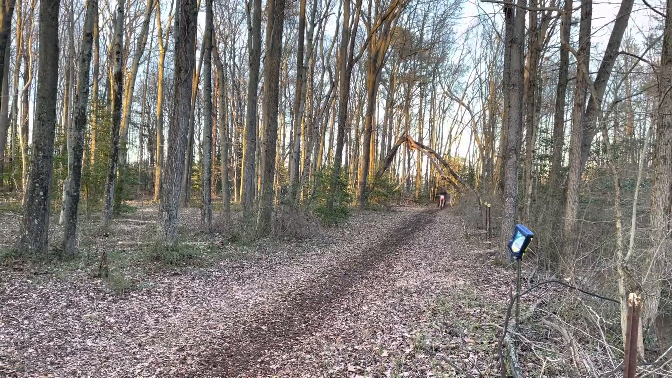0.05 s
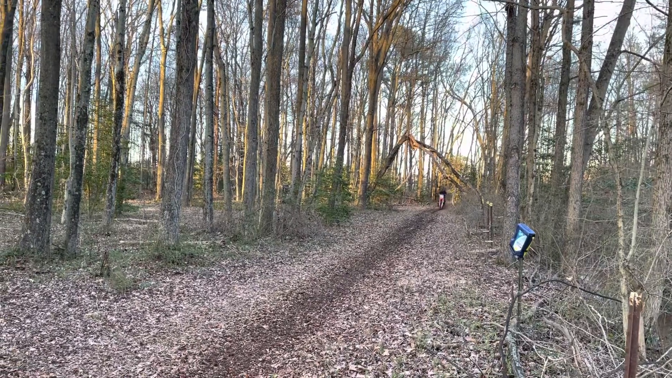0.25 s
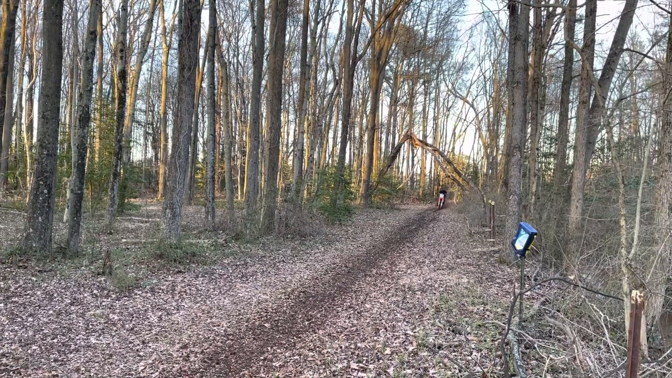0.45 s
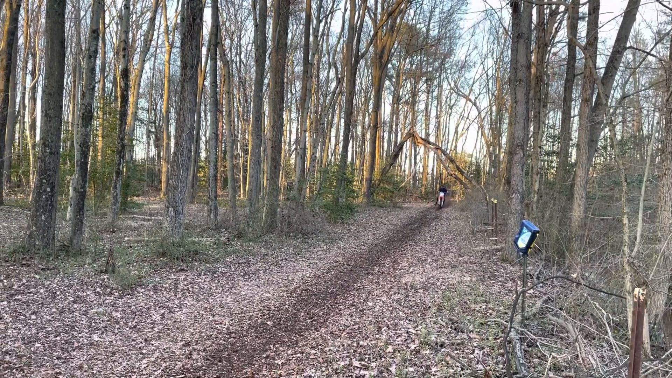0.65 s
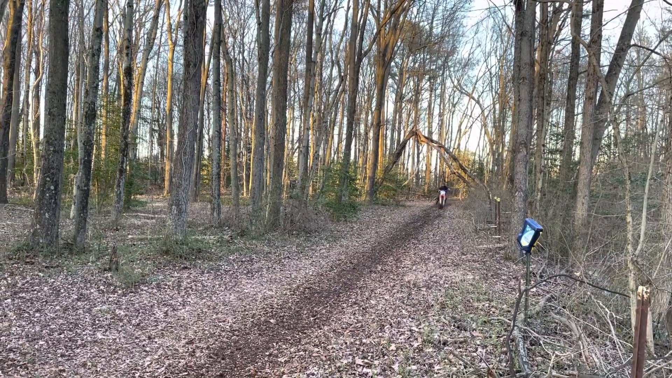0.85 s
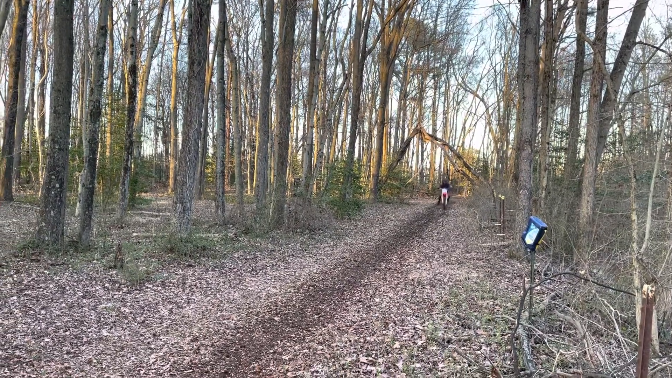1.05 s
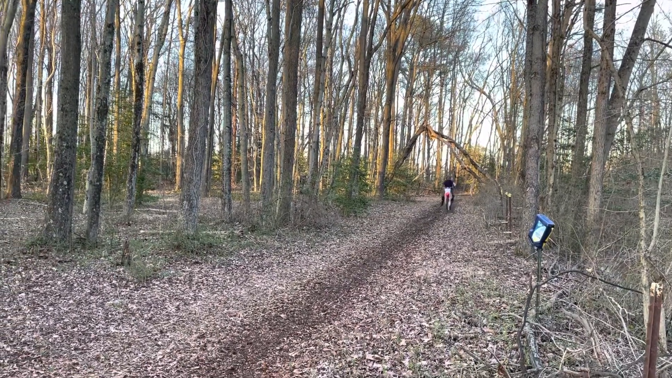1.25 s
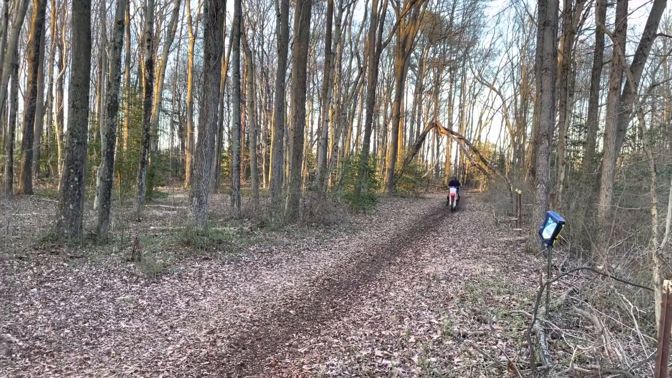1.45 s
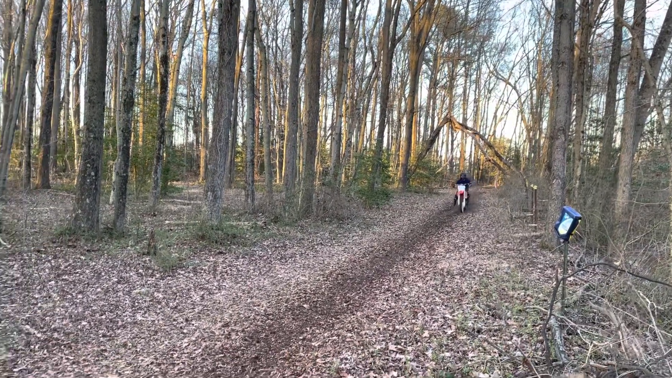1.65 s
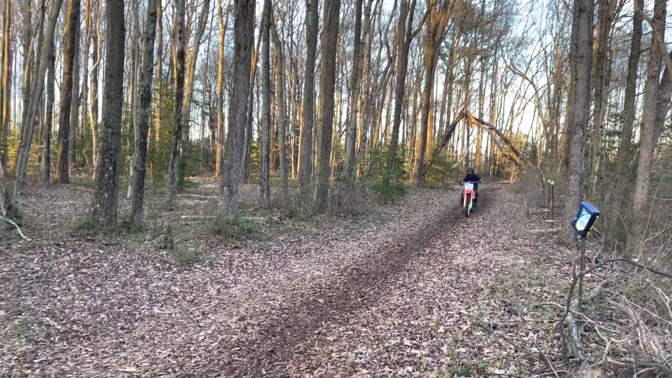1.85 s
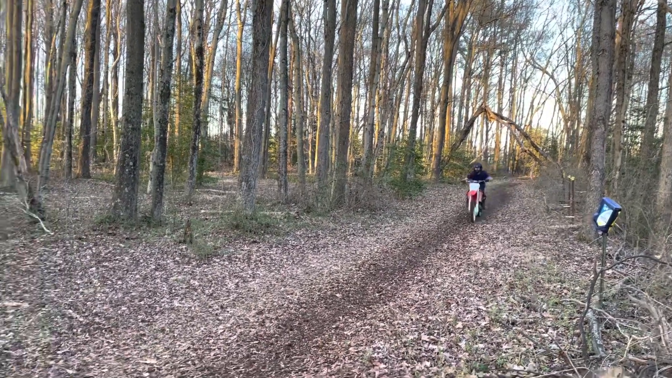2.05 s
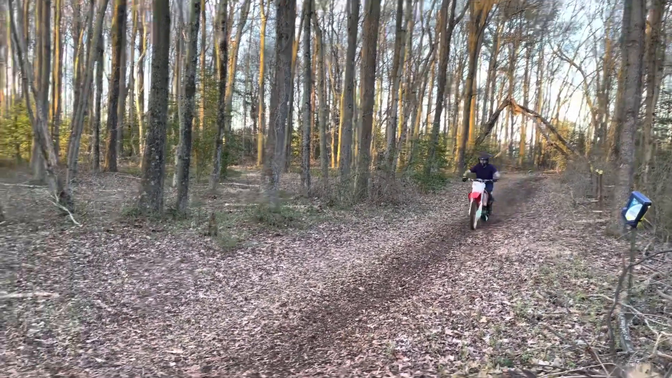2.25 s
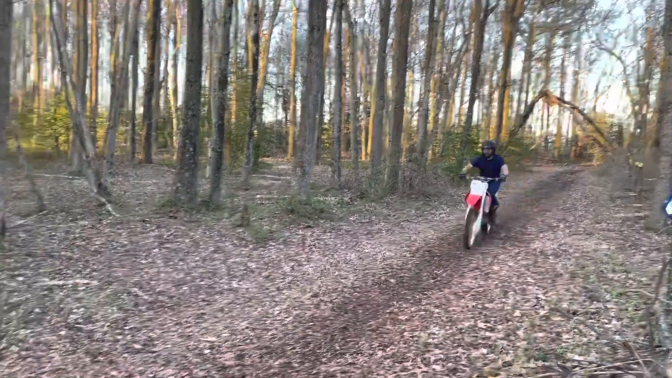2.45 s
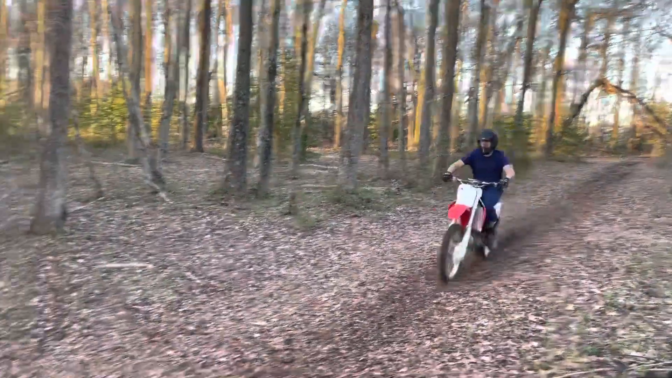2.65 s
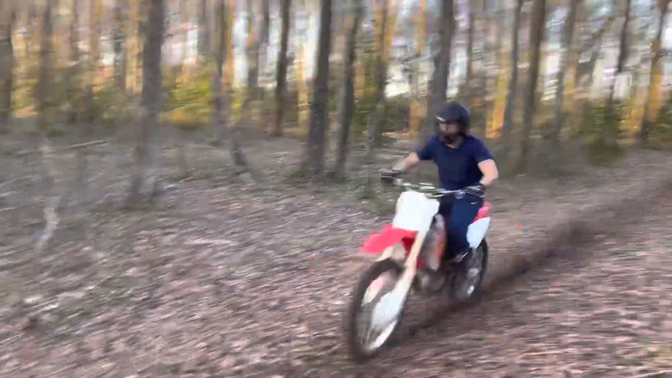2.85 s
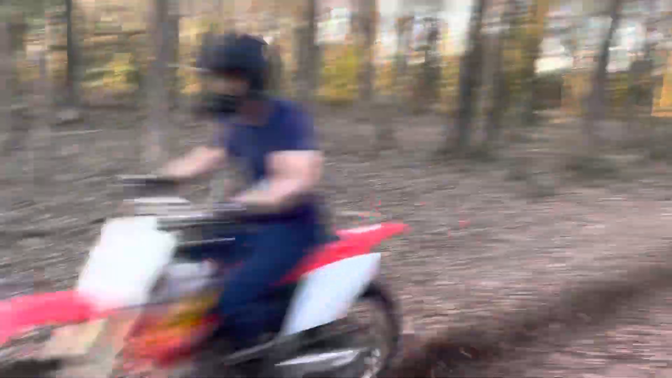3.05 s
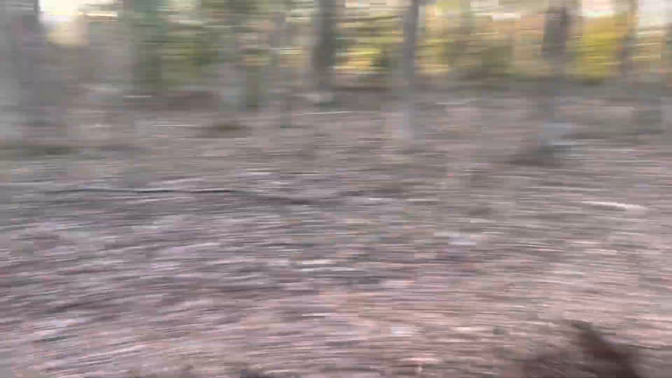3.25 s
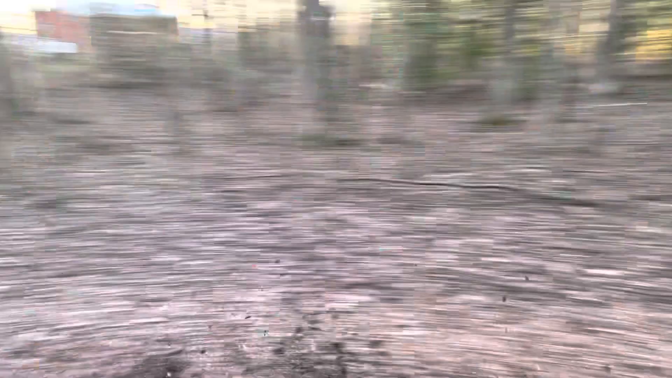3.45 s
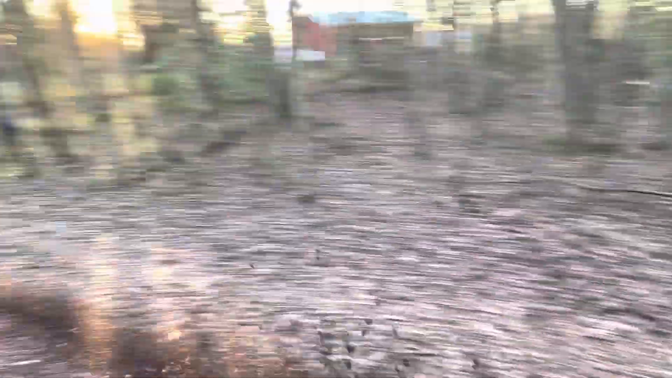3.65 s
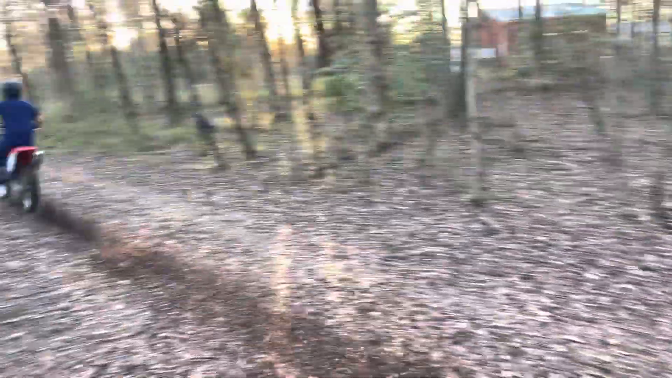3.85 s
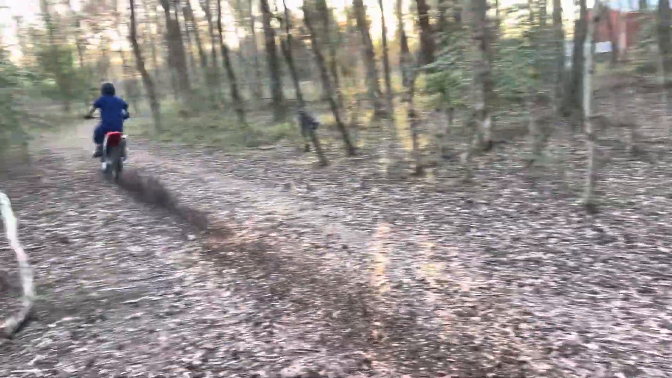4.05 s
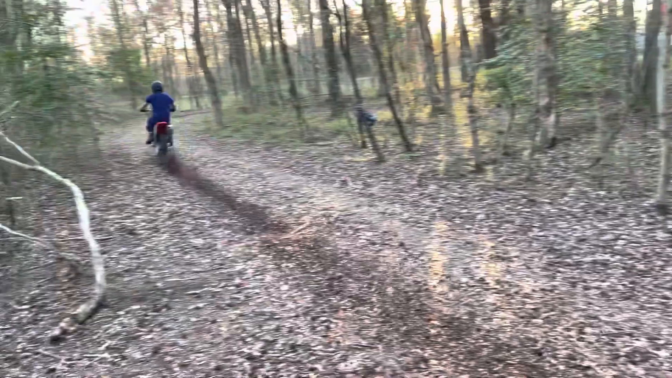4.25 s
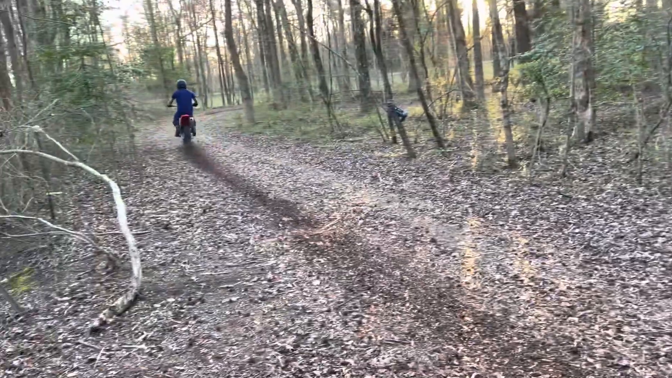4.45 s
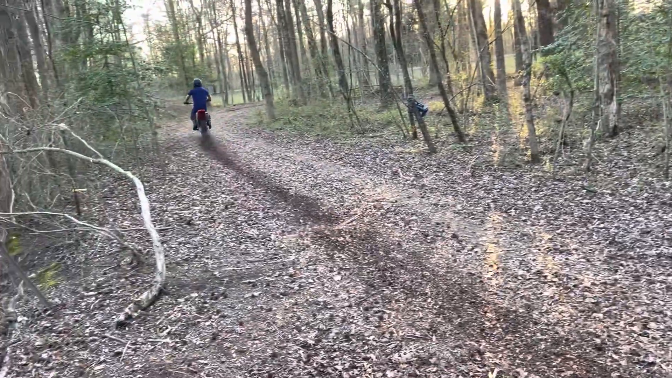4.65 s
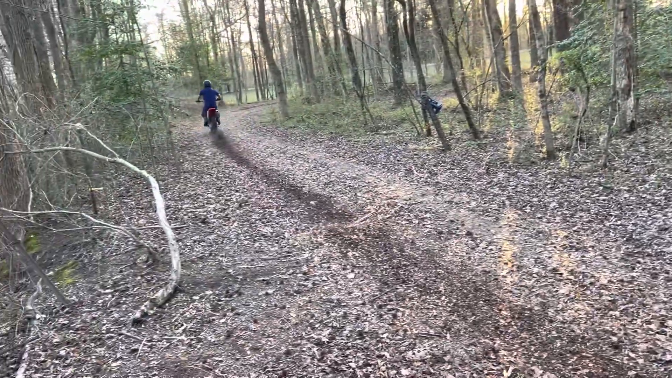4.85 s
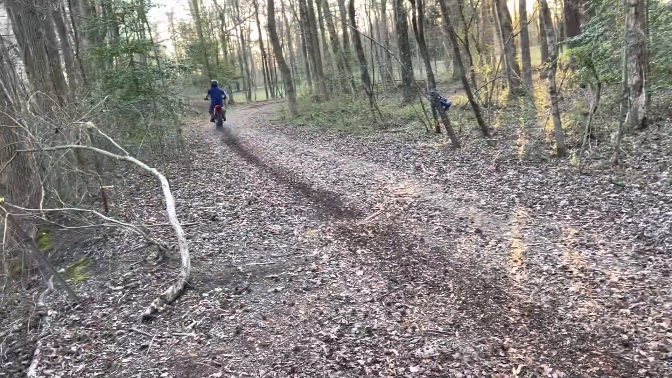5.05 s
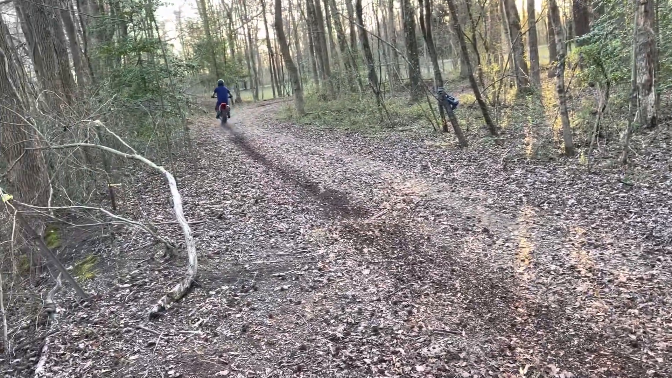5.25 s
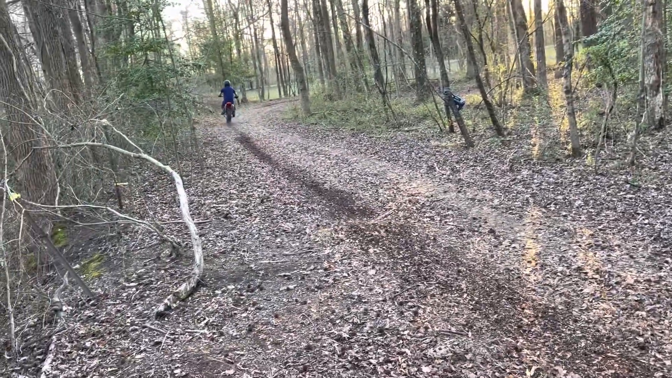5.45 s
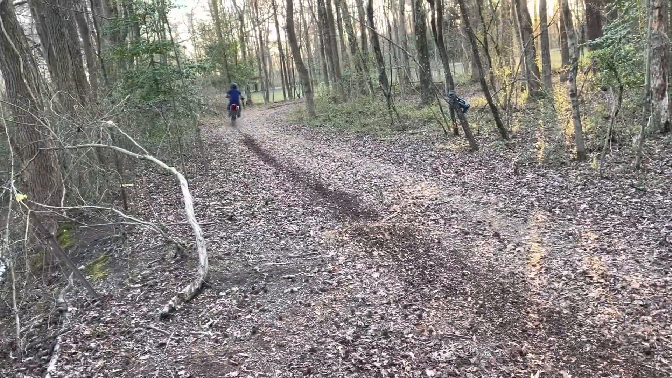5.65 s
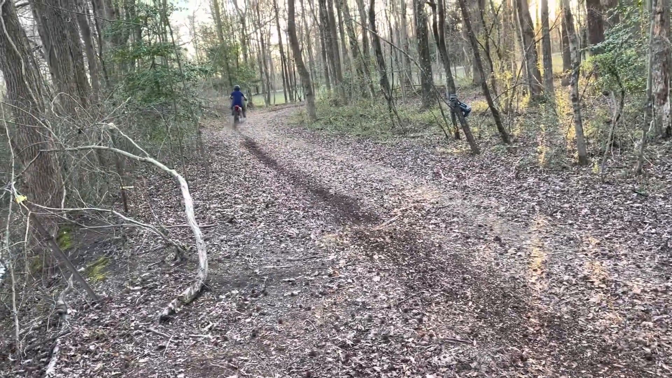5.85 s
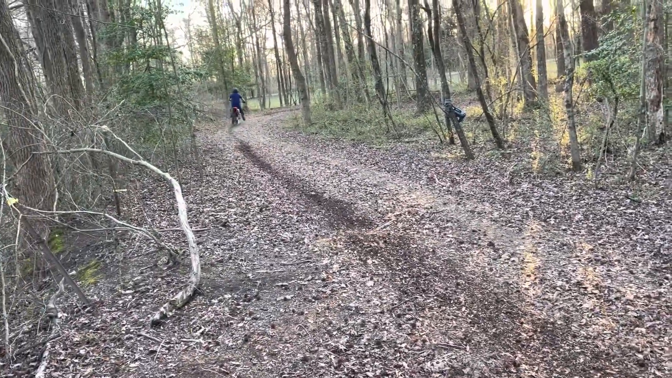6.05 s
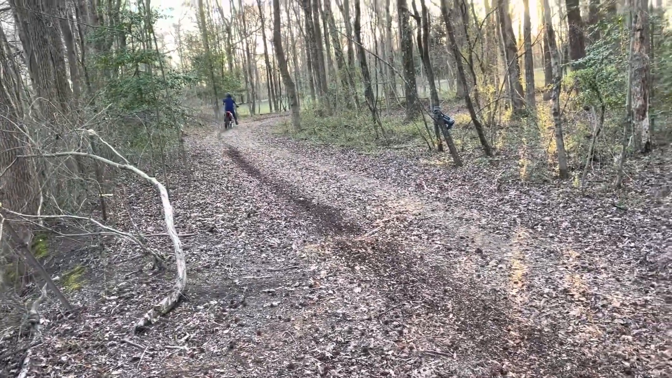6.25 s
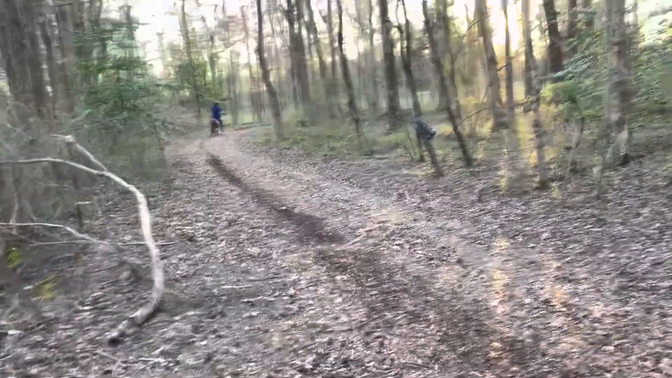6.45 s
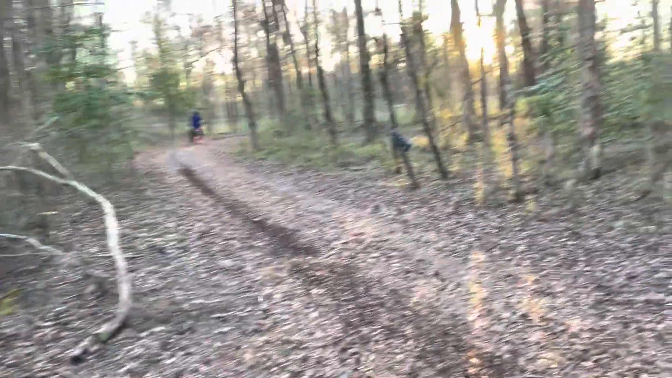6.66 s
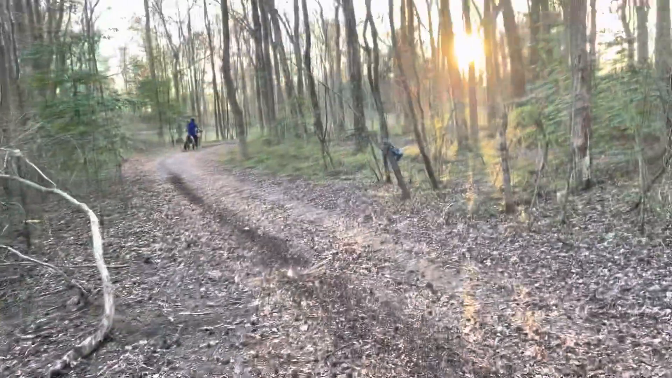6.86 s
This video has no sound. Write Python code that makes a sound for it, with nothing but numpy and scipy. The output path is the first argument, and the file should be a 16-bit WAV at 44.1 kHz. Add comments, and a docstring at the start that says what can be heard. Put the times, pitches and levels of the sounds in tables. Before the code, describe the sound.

In leafy woods, a single-cylinder four-stroke dirt bike approaches in five raspy throttle bursts, growing louder as tree echoes surround it. The throttle shuts and the pitch falls as it sweeps right past the microphone with tyres crunching leaves. Dirt patters down, the engine coasts away in slow separate thumps, two sharp exhaust bangs crack, and twigs and leaves stir nearby.

```python
"""Dirt bike passing on a wooded trail

Stereo, ear height 1.5 m, 1.8 m off the trail: a single-cylinder four-stroke comes up in short bursts of
throttle, rolls off, passes close at about 3.15 s and coasts away. Each engine cycle sends a filtered puff
through the silencer; shaped noise in step with the cycles makes the rasp, intake, valve gear and cases.
On the overrun, impulses make hard charges thump and crack, and twice the exhaust bangs. Random echoes are
the trunks; noise and grains are dry leaves under the tyres and nearby, twigs, ticks and the hush of the wood."""
import sys
import numpy as np
from scipy import signal
from scipy.fft import rfft, irfft, next_fast_len
from scipy.io import wavfile
from scipy.ndimage import uniform_filter1d

SR = 44100
rng = np.random.default_rng(int(sys.argv[2]) if len(sys.argv) > 2 else 0)


def put_to_file(sound):
    """Save the sound as 16-bit audio at rate SR, in the file named by the first command-line argument."""
    columns = np.atleast_2d(sound).T  # one column per channel
    safe = np.clip(columns, -1, 1)
    whole_steps = np.round(safe * 32767)
    wavfile.write(sys.argv[1], SR, whole_steps.astype(np.int16))


N = 305157
SIZE = next_fast_len(N + SR)
SIZE += SIZE % 2
HZ = np.maximum(np.arange(SIZE // 2 + 1) * SR / SIZE, 1)
TIME = np.arange(N) / SR

# Straight ride past the microphone; the two heights set the lag of the ground bounce
PASSING_S, NEAREST_M, SPEED_M_S = 3.15, 1.8, 7.2
PIPE_HEIGHT_M, EAR_HEIGHT_M = 0.601, 1.482

# Bursts of throttle: opens t/s, speed then/(cycles/s), eases t/s, speed then/(cycles/s),
# bend of the climb (over 1 = quick at first), throttle 0-1, throttle left on afterwards 0-1
THROTTLE_BURSTS = [(0.0, 104.4, 0.12, 114.7, 1.1, 0.99, 0.94), (0.235, 79.53, 0.49, 92.7, 1.5, 0.92, 0.79),
                   (0.69, 82.37, 0.88, 94.56, 1.2, 0.89, 0.95),
                   (1.05, 88.2, 1.332, 113.1, 0.4, 0.941, 0.015),
                   (1.542, 82.52, 2.02, 107.3, 1.6, 0.87, 0.23)]
# Throttle shut, rolling past and away: t/s, engine speed/(cycles/s)
COASTING = [(2.16, 80.5), (2.36, 76.5), (2.55, 70.6), (2.7, 70.5), (2.8, 68.4), (2.87, 65.2), (2.95, 59.3),
            (3.05, 51), (3.15, 46.3), (3.22, 47), (3.29, 42), (3.36, 35.5), (3.46, 31.5), (3.56, 29.5),
            (3.72, 25.2), (3.9, 22.5), (4.77, 21.6), (4.83, 33), (4.93, 40), (5.19, 38.5), (5.3, 30),
            (5.4, 24), (5.82, 23.2), (5.97, 31.5), (6.2, 31.2), (6.55, 28.6), (6.9, 26.8)]
SAG_BEND, THROTTLE_OPENS_S = 1.2, 0.012
# Bumps in the trail jolt the driven wheel: rms share of engine speed at full load, random steps per s
JOLT_SHARE, JOLT_STEPS_PER_S = 0.009, 22

# Exhaust close by, throttle shut: engine speed/(cycles/s), boom, bark, rasp, blare level/dB
EXHAUST_LEVELS = [(21.96, -16.5, -36, -48.5, -58), (25.4, -15.5, -35, -43.5, -35),
                  (29.1, -11.5, -30.5, -44, -35), (38.4, -7, -22.5, -41.5, -33.5),
                  (47.2, -12, -13, -30, -21), (57.66, -9, -27, -23, -19), (66.5, -11, -14.5, -25.5, -26),
                  (76.3, -12, -12.5, -26, -25), (86.6, -16, -13.5, -26.5, -7.5), (113, -15.5, -9, -26, -16)]
# Hot gas and the approach shift the resonances: t/s, boom pitch ratio, bark and blare pitch ratio
PIPE_TUNING = [(0, 1.27, 1), (1.0, 1.076, 1.013), (1.9, 1.12, 1.113), (2.3, 1.22, 1.284),
               (2.9, 1.216, 1.194), (3.06, 1.13, 1.27), (3.2, 1.16, 1.2), (3.42, 1.014, 1.23),
               (4.5, 1.043, 0.65), (5.12, 1.184, 1.01), (5.5, 0.9, 1.12), (6.02, 1.076, 1.1),
               (6.55, 1.02, 1.06), (6.9, 1.01, 1.26)]
# Silencer chambers that hold back the low notes of each puff: f/Hz, width/Hz
SILENCER_CHAMBERS = [(120, 161), (240, 313)]
# Round boom of the puff: f/Hz, level/dB
BOOM_SPECTRUM = [(25, -53), (45, -10.5), (65, 2.5), (92, -0.5), (132, 10.5), (160, 3.5), (185, -13.5),
                 (210, -17), (280, -50), (500, -31.5), (4000, -120)]
# Slack, deep puff of a missed charge: f/Hz, level/dB
SLACK_SPECTRUM = [(25, -61), (48, -4), (70, 6), (100, 7), (130, -14), (170, -18), (280, -39), (4000, -120)]
# Harder bark of the puff: f/Hz, level/dB
BARK_SPECTRUM = [(110, -90.5), (190, 2), (240, 8), (275, 10.5), (320, 1), (385, -10.5), (480, -8.5),
                 (600, -12), (720, -45), (1200, -46), (2200, -35), (4000, -31), (12000, -87)]
# Hard ring of the open pipe mouth: f/Hz, level/dB
BLARE_SPECTRUM = [(200, -36.5), (300, -1.5), (380, 3.5), (470, 1), (560, -3.5), (670, 2), (800, -10.5),
                  (950, -19), (1200, -27.5), (1500, -27), (2500, -31), (12000, -75)]
# Rasp of the gas jet: f/Hz, level/dB
RASP_SPECTRUM = [(250, -11.5), (450, 5.5), (620, 7.5), (780, 2), (980, 4), (1250, 0.5), (1900, -0.5),
                 (2230, 5), (2400, 0.5), (2680, -2), (3000, -7.5), (4000, -12.5), (6600, -23.5),
                 (11000, -77), (14000, -71)]
# Combustion is lumpy at low speed and ragged at the very top (cycles/s)
LUMPY_BELOW, RAGGED_ABOVE = 29, 109
UNEVEN_DB = 0.7  # spread of puff volume where the lumpiness is 1
# Near idle some charges miss: below cycles/s, chance that a charge is unlucky
MISSES_BELOW, UNLUCKY_CHANCE = 28, 0.8
# Under load the boom wavers: rms depth at full load, random steps per s
BOOM_WAVER_DB, BOOM_WAVER_STEPS_PER_S = 2.2, 22
GAS_REPEAT_LEVEL = 0.32  # noise repeated every cycle, against fresh noise

# Hard firings on the overrun: t/s, thump level/dB and crack level/dB, both before trim
HARD_FIRINGS = [(3.418, -15, -27), (3.547, -21, -41), (3.647, -7, -31), (3.808, -14, -25),
                (3.893, -10, -36), (3.984, -9.5, -25.5), (4.076, -9.5, -26), (4.169, -9.5, -34),
                (4.258, -14.5, -35), (4.356, -11, -25.5), (4.448, -12, -25), (4.542, -11.5, -25),
                (4.632, -11.5, -25), (4.723, -13, -30), (4.8098, -6, -10), (4.841, -18, -11),
                (4.866, -20, -18), (4.997, -7, -9), (5.024, -18, -10), (5.047, -14.5, -15.5),
                (5.362, -20, -26.5), (5.518, -15, -31), (5.645, -13.5, -27), (5.735, -15.5, -28),
                (5.818, -14.5, -29), (5.933, -21.5, -29), (6.096, -28, -34), (6.126, -28, -34),
                (6.155, -26, -44), (6.352, -19, -40), (6.485, -20.5, -32), (6.621, -12.5, -32),
                (6.73, -20, -47), (6.772, -18, -35), (6.881, -20.5, -45)]
# Fuel crackling at every puff as the engine picks up: from t/s, until t/s, front level/dB
AFTERBURN_SPELLS = [(4.87, 5.35, -31), (5.96, 6.6, -34.5)]
# Thump in the silencer: f/Hz, level/dB
THUMP_SPECTRUM = [(25, -27), (50, -9), (80, -4.5), (135, 0), (185, -5.5), (240, -3.5), (330, -17.5),
                  (450, -30.5), (800, -35), (2000, -110), (8000, -100)]
# Crack in the pipe: f/Hz, level/dB
CRACK_SPECTRUM = [(120, -43), (300, 6.5), (550, 2.5), (800, -5.5), (1150, -2.5), (1400, -6.5), (1680, -4.5),
                  (1900, -14.5), (2200, -11), (2700, -41), (6000, -29), (12000, -64)]
# Bright shock of a backfire: f/Hz, level/dB
SHOCK_SPECTRUM = [(500, -9), (2000, 0), (3500, 11), (6500, -11), (9000, -10), (14000, -23)]

# The intake snarls forwards and is shadowed once the bike is past: level close by, shadow's time scale
INTAKE_DB, INTAKE_SHADOW_S = -19, 0.032
# Intake snarl: f/Hz, level/dB
INTAKE_SPECTRUM = [(300, -52), (700, 0), (950, -5), (1200, -0.5), (1500, 6.5), (1780, -14), (2080, 4),
                   (2400, -16), (2800, -21), (6000, -9.5), (14000, -46)]
# Valve gear and chain: level close by at 60 cycles/s, rise per doubling of speed
CLATTER_DB, CLATTER_DB_PER_OCTAVE = -30, 8
# Valve gear and chain: f/Hz, level/dB
CLATTER_SPECTRUM = [(250, -26), (500, -4), (850, 14), (1200, 2.5), (1500, 4.5), (1800, -17), (2200, -14),
                    (2700, -11), (3100, 5), (3600, 2), (6500, -4.5), (14000, -75)]
# Ringing engine cases: f/Hz, width/Hz, level/dB close by at 30 cycles/s, share of the spreading loss
CASE_RINGS = [(1173, 240, -46.5, 0.38), (2163, 35, -50.5, 0.63), (2600, 186, -45, 0.66),
              (3580, 340, -42, 1.6)]
# The cases ring out backwards, so they are loudest just after the pass
CASES_LAG_S, CASES_DB_PER_OCTAVE, CASES_LOAD_DB = 0.1, 7, 6
# Whining gears: tooth meshes per engine cycle, relative level/dB
GEAR_NOTES = [(37, -3), (52, 9.5)]
# Level close by, random steps per s that roughen each note, cycles/s below which they show
WHINE_DB, WHINE_STEPS_PER_S, WHINE_BELOW = -39, 98, 27.5

# Tyres in dry leaves: level close by, rise when the rear wheel is driven at full load
TYRES_DB, WHEELSPIN_DB = -24.5, 18
# Crushed leaves: f/Hz, level/dB
LEAF_SPECTRUM = [(200, 15.5), (700, 17), (1200, 9.5), (1700, 6.5), (2600, 4.5), (4000, 1.5), (6500, -1),
                 (10500, -5), (14000, -8.5)]
# Leaves and dirt falling back on the trail: thickest moment, level then, rise and fall
SPRAY_S, SPRAY_DB, SPRAY_RISE_DB_PER_S, SPRAY_FALL_DB_PER_S = 3.75, -45, 50, 30
# Falling leaves and dirt: f/Hz, level/dB
SPRAY_SPECTRUM = [(800, -26), (2500, -17), (4500, 8), (7000, -8), (11000, 1), (14000, -8)]
# Leaves stirred close by: t/s, level/dB at the height of the swell
LEAF_STIRS = [(5.719, -67), (6.11, -50), (6.251, -40.5), (6.449, -41), (6.898, -51)]
RUSTLE_RISE_DB_PER_S, RUSTLE_FALL_DB_PER_S = 65, 136
# Leaves stirred close by: f/Hz, level/dB
RUSTLE_SPECTRUM = [(300, -15), (1200, -2.5), (2700, 1), (5000, -1), (7000, -7.5), (11000, -3.5),
                   (14000, -11)]
# Twigs snapping: t/s, level/dB before trim
TWIG_SNAPS = [(4.7728, -42), (5.273, -57), (5.663, -33.5), (5.698, -31.5), (5.738, -33.5), (6.092, -39),
              (6.127, -48), (6.2584, -38), (6.335, -32), (6.8835, -44)]
# Splintering twig: f/Hz, level/dB
SNAP_SPECTRUM = [(500, 16.5), (2500, 20.5), (5000, 13), (11000, -6), (15000, -67)]
# Bright ticks in the litter: t/s, level/dB before trim
LITTER_TICKS = [(3.935, -36), (4.0108, -39), (4.1744, -33), (4.7746, -29), (5.6638, -27), (6.336, -23),
                (6.8833, -42)]
# Hush of the wood: f/Hz, level/dB
AIR_SPECTRUM = [(20, -36), (60, 23), (200, -26), (600, -5), (2500, -8), (6000, -9), (14000, -122)]

# Scattered over direct sound, least while the bike is near and faces the listener:
# t/s, level/dB before each exhaust voice's own offset
SCATTER_LEVEL = [(0, -4), (1.2, -6), (1.8, -9), (2.6, -11), (3.1, -11), (3.5, -9), (4.2, -8), (5.2, -9),
                 (6.9, -6)]
# Left-right difference against the common sound: f/Hz, level/dB
STEREO_WIDTH = [(60, -15.5), (200, -10.5), (350, -8.5), (600, -3), (1200, -1), (2300, -2.5), (4500, -3.5),
                (9500, 7), (14000, -17)]
WOODS_T60_S = 1
# Echoes off the nearest trunks: strength, rms wander of the lag, random steps per s
TRUNK_ECHO, TRUNK_WANDER_S, TRUNK_STEPS_PER_S = 0.3, 0.0004, 4
CUTOFF_HZ = 13900


def exhaust(pipe, cycles, rate, front_db=2.15, jitter_s=.00005):
    """One puff per cycle: a round boom, a harder bark, a blare from the pipe mouth and a rasp on top."""
    scatter_db, = in_time(SCATTER_LEVEL)
    boom_ratio, bark_ratio = in_time(PIPE_TUNING)
    times = puff_times(cycles)
    chance = rng.standard_normal(size=(600, 3))[:len(times)]
    speeds = np.interp(times, TIME, rate)
    ragged = np.minimum((speeds / RAGGED_ABOVE) ** 40, 3)
    lumpy = .5 + (LUMPY_BELOW / speeds) ** 3 + ragged
    times = times + jitter_s * lumpy * chance[:, 0]
    volumes = from_db(UNEVEN_DB * lumpy * chance[:, 1])
    # the steep front of the puff varies more from cycle to cycle than its volume
    fronts = volumes * from_db(front_db * lumpy * chance[:, 2])

    # a miss is followed by a good charge
    unlucky = (rng.random(600)[:len(times)] < UNLUCKY_CHANCE) & (speeds < MISSES_BELOW)
    missed = unlucky & ~np.roll(unlucky, 1)
    good_puffs = tuned_pipe(times, volumes * ~missed, response(BOOM_SPECTRUM) * pipe, boom_ratio)
    slack_puffs = tuned_pipe(times, volumes * missed, response(SLACK_SPECTRUM) * pipe, boom_ratio)
    boom = steady(woods(good_puffs + slack_puffs, scatter_db - 6), span_s=0.068)
    waver_db = BOOM_WAVER_DB * load(release_s=0.14) * drift(BOOM_WAVER_STEPS_PER_S)
    boom = boom * from_db(waver_db)

    bark = tuned_pipe(times, fronts, response(BARK_SPECTRUM) * pipe, bark_ratio)
    bark = steady(ground(woods(bark, scatter_db - 6), bounce=0.42))
    rasp = through(jet(cycles, rate), response(RASP_SPECTRUM))
    rasp = steady(woods(ground(rasp[None], bounce=0.13)[0], scatter_db + 4))
    blare = tuned_pipe(times, fronts, response(BLARE_SPECTRUM) * pipe, bark_ratio)
    blare = steady(ground(woods(blare, scatter_db - 1), bounce=0.64))
    return (boom * loudness(rate, "boom", load_db=3.0, release_s=0.03, spreading=0.52)
            + bark * loudness(rate, "bark", load_db=10.5, release_s=0.032, spreading=0.85)
            + rasp * loudness(rate, "rasp", load_db=12.5, release_s=0.24, spreading=0.17)
            + blare * loudness(rate, "blare", load_db=3.5, release_s=0.09, spreading=1.34))


def jet(cycles, rate, flutter_db=1.0):
    """Gas tears out of the pipe at each puff, partly alike from cycle to cycle."""
    gas = rng.standard_normal(N) + GAS_REPEAT_LEVEL * each_cycle(cycles, count=256)
    pulsing = gas * throb(cycles, rate, decay_s=0.0036, floor=0.62)
    return trunks(pulsing * from_db(flutter_db * drift(40)))


def silencer():
    """Each chamber delays the sound near its resonance, so a puff sweeps downward in pitch."""
    gain = 1
    for hz, width_hz in SILENCER_CHAMBERS:
        pole = hz ** 2 - HZ ** 2 + 1j * HZ * width_hz
        gain = gain * np.conj(pole) / pole
    return gain


def tuned_pipe(times, sizes, gain, ratio):
    """Puffs ring in a pipe whose resonances all rise and fall together: its clock runs fast or slow."""
    clock = np.cumsum(ratio) / SR
    puffs = np.bincount((np.interp(times, TIME, clock) * SR).astype(int), sizes)
    return read(irfft(rfft(puffs, SIZE) * gain), clock)


def loudness(rate, column, load_db, release_s, spreading):
    """Gain of one exhaust voice, set by engine speed, load and its share of the spreading loss."""
    levels = np.array(EXHAUST_LEVELS)
    column_index = 1 + ["boom", "bark", "rasp", "blare"].index(column)
    shut_db = np.interp(rate, levels[:, 0], levels[:, column_index])
    return from_db(shut_db + load_db * load(release_s) + spreading * spreading_db())


def engine_cycles():
    """Cycles turned so far, shifted so that every hard firing falls on a whole cycle; and engine speed."""
    rate = engine_speed()
    turned = np.cumsum(rate) / SR
    times = np.array(HARD_FIRINGS)[:, 0]
    slip = np.unwrap(np.interp(times, TIME, turned) % 1, period=1)
    return turned - np.interp(TIME, times, slip), rate


def engine_speed():
    """Cycles per second: the engine climbs in each burst, sags until the next and at last coasts."""
    rate = np.full(N, float(THROTTLE_BURSTS[0][1]))
    following = [row[:2] for row in list(THROTTLE_BURSTS)[1:]] + [COASTING[0]]
    for (opens, low, eases, top, bend, _, _), (next_s, next_low) in zip(THROTTLE_BURSTS, following):
        climb = glide(opens, low, eases, top, bend)
        sag = glide(eases, top, next_s, next_low, SAG_BEND)
        rate = np.where(TIME >= opens, np.where(TIME < eases, climb, sag), rate)
    rate = np.where(TIME >= COASTING[0][0], in_time(COASTING)[0], rate)
    return rate * (1 + JOLT_SHARE * load(release_s=0.099) * drift(JOLT_STEPS_PER_S))


def glide(start_s, start, end_s, end, bend):
    """A move from one speed to another."""
    left = np.clip((end_s - TIME) / (end_s - start_s), 0, 1)
    return end + (start - end) * left ** bend


def load(release_s):
    """Engine load, 0-1: it comes quickly with the throttle and dies away after it."""
    throttle = np.full(N, float(THROTTLE_BURSTS[0][5]))
    for opens, _, eases, _, _, held, left_on in THROTTLE_BURSTS:
        throttle[TIME >= opens] = held
        throttle[TIME >= eases] = left_on
    throttle[TIME >= COASTING[0][0]] = 0
    # a running maximum against a ramp lets the load fall no faster than 1 per release_s
    fall = TIME / release_s
    held_load = np.maximum.accumulate(throttle + fall) - fall
    return uniform_filter1d(held_load, int(THROTTLE_OPENS_S * SR))


def puff_times(cycles):
    """The moment of each whole cycle."""
    return np.interp(np.arange(np.ceil(cycles[0]), cycles[-1]), cycles, TIME)


def each_cycle(cycles, count):
    """One random pattern that repeats with every engine cycle."""
    return np.interp(cycles % 1, np.linspace(0, 1, count), rng.standard_normal(count))


def throb(cycles, rate, decay_s, floor):
    """A gain that jumps at each cycle and dies away towards a floor."""
    return floor + np.exp(-(cycles % 1) / rate / decay_s)


def overrun(pipe, cycles, tear=0.091, tear_s=0.006, pipe_echo=0.096, pipe_echo_s=0.00104):
    """A hard firing thumps in the silencer; unburnt fuel going off in the pipe adds a torn crack."""
    times, thumps_db, cracks_db = np.transpose(HARD_FIRINGS)
    thump = through(strikes(times, from_db(thumps_db + 1)), peak_one(response(THUMP_SPECTRUM) * pipe))
    sizes = from_db(cracks_db + 7)
    # weak charges burn with hardly any crack
    fronts = strikes(times, sizes ** 2 / (sizes + .18)) + afterburn(cycles)
    flame = dying(fronts, tear_s)
    # the front comes back once, inverted, from the open end of the pipe
    returned = pipe_echo * read(fronts, TIME - pipe_echo_s)
    burst = fronts - returned + tear * flame * rng.standard_normal(N)
    crack = through(burst, peak_one(response(CRACK_SPECTRUM) * pipe))
    # weighting by the flame lets only the strongest fronts steepen into a bright shock
    shock = from_db(-13) * through(burst * flame, peak_one(response(SHOCK_SPECTRUM)))
    return woods(thump, wet_db=-6.5) + woods(crack, wet_db=-10.0) + woods(shock, wet_db=1.0)


def afterburn(cycles, uneven_db=4.0):
    """A small uneven crack on every puff while fuel burns on in the pipe."""
    times = puff_times(cycles)
    sizes = sum(from_db(db) * ((times > start_s) & (times < end_s)) for start_s, end_s, db in AFTERBURN_SPELLS)
    return strikes(times, sizes * from_db(uneven_db * rng.standard_normal(600)[:len(times)]))


def intake(cycles, rate, loose=0.42, wet_db=-12, spreading=4.0, lead_s=0.082):
    """A gulp of air every cycle gives a snarl of close harmonics that falls with the engine."""
    gulps = each_cycle(cycles, count=200) + loose * rng.standard_normal(N)
    gulps = gulps * throb(cycles, rate, decay_s=0.018, floor=1.0)
    facing = .5 - .5 * np.tanh((TIME - PASSING_S + lead_s) / INTAKE_SHADOW_S)
    snarl = steady(ground(woods(through(gulps, response(INTAKE_SPECTRUM)), wet_db), bounce=0.16))
    return snarl * facing * from_db(INTAKE_DB + spreading * spreading_db())


def valve_gear(cycles, rate, loose=2.3, wet_db=-6, spreading=0.99):
    """The mechanism repeats one clatter every cycle under looser noise; it shows when the bike is near."""
    rattle = each_cycle(cycles, count=320) + loose * rng.standard_normal(N)
    rattle = rattle * throb(cycles, rate, decay_s=0.027, floor=1.0)
    clatter = trunks(through(rattle, response(CLATTER_SPECTRUM)))
    level_db = CLATTER_DB + CLATTER_DB_PER_OCTAVE * np.log2(rate / 60) + spreading * spreading_db()
    return steady(ground(woods(clatter, wet_db), bounce=0.18)) * from_db(level_db)


def cases(cycles, rate, wet_db=-6, waver_db=3):
    """The engine cases ring, each note wavering, a little sharp on the way in and flat on the way out."""
    near_db = read(spreading_db(), TIME - CASES_LAG_S)
    rings = 0
    for hz, width_hz, db, spreading in CASE_RINGS:
        damping = 1j * HZ * width_hz
        note = rms_one(through(rng.standard_normal(N), damping / (hz ** 2 - HZ ** 2 + damping)))
        rings = rings + note * from_db(db + spreading * near_db + waver_db * drift(7.7))
    # the changing travel time bends the pitch
    heard = read(rings, TIME - (distance_m() - NEAREST_M) / 343)
    heard = heard * rms_one(throb(cycles, rate, decay_s=0.01, floor=0.4))
    level_db = CASES_DB_PER_OCTAVE * np.log2(rate / 30) + CASES_LOAD_DB * load(release_s=0.12)
    return woods(heard * from_db(level_db), wet_db)


def gear_whine(cycles, rate, wet_db=-9, spreading=1.18):
    """Near idle the slack gears whine: rough notes that follow the engine speed."""
    notes = sum(from_db(db) * np.sin(2 * np.pi * teeth * cycles) * drift(WHINE_STEPS_PER_S)
                for teeth, db in GEAR_NOTES)
    slack = 1 / (1 + (rate / WHINE_BELOW) ** 12)
    return woods(rms_one(notes) * slack * from_db(WHINE_DB + spreading * spreading_db()), wet_db)


def tyres(spreading=1.78):
    """The tyres crush leaves, harder under power; so low a sound fades fast with distance."""
    level_db = TYRES_DB + WHEELSPIN_DB * load(release_s=0.17) + spreading * spreading_db()
    return leaves(level_db, LEAF_SPECTRUM, per_s=5900, hiss=1.0)


def spray():
    """Leaves and dirt flung up by the rear wheel patter down behind the bike."""
    before_db = SPRAY_RISE_DB_PER_S * (SPRAY_S - TIME)
    after_db = SPRAY_FALL_DB_PER_S * (TIME - SPRAY_S)
    return leaves(SPRAY_DB - np.maximum(before_db, after_db), SPRAY_SPECTRUM, per_s=820, hiss=0.18)


def rustles():
    """Each stir of the nearby leaves swells and dies away."""
    swells_db = [db - np.maximum(RUSTLE_RISE_DB_PER_S * (s - TIME), RUSTLE_FALL_DB_PER_S * (TIME - s))
                 for s, db in LEAF_STIRS]
    return leaves(np.max(swells_db, axis=0), RUSTLE_SPECTRUM, per_s=2500, hiss=0.34)


def leaves(level_db, colour, per_s, hiss):
    """Countless small fractures of dry leaves over a hiss, coming in clumps."""
    born = rng.random((2, N)) < per_s / SR
    sizes = from_db(2.5 * np.minimum(rng.exponential(1, (2, N)), 4))
    clumps = from_db(2.05 * drift(45))
    grains = rng.standard_normal((2, N)) * (hiss + born * sizes) * clumps
    return rms_one(through(grains, response(colour))) * from_db(level_db)


def twigs(decay_s=0.023, level_db=-7):
    """A twig breaks with a brief bright splintering."""
    times, peaks_db = np.transpose(TWIG_SNAPS)
    splinter = dying(strikes(times, from_db(peaks_db + level_db)), decay_s)
    return splinter * rms_one(through(rng.standard_normal((2, N)), response(SNAP_SPECTRUM)))


def ticks(decay_s=0.0014, level_db=-7):
    """Tiny, very bright ticks in the dry litter: short bursts of differenced noise."""
    times, peaks_db = np.transpose(LITTER_TICKS)
    burst = dying(strikes(times, from_db(peaks_db + level_db)), decay_s)
    return burst * rms_one(np.diff(rng.standard_normal((2, N + 1))))


def air(level_db=-52):
    """The quiet hush of the wood: steady shaped noise."""
    return from_db(level_db) * rms_one(through(rng.standard_normal((2, N)), response(AIR_SPECTRUM)))


def woods(x, wet_db, off_axis=0.32):
    """Direct sound plus a dying cloud of echoes from the trunks, as (mid, side)."""
    t = TIME[:SR]
    echoes = rng.standard_normal((2, SR)) * from_db(-60 * t / WOODS_T60_S) * (1 - np.exp(-t / 0.0045))
    echoes *= from_db(4 * drift(160)[:SR])  # the cloud is uneven
    echoes /= np.sqrt(np.sum(echoes[0] ** 2))
    return np.array([x, off_axis * x]) + through(x * from_db(wet_db), rfft(echoes, SIZE))


def trunks(x, count=4):
    """Short sliding echoes make the upper partials swell and fade in turn."""
    lags = rng.uniform(.003, .009, count)
    echoes = 0
    for k, lag in enumerate(lags):
        wander = TRUNK_WANDER_S * drift(TRUNK_STEPS_PER_S)
        echoes = echoes + (-1) ** k * read(x, TIME - lag - wander)
    return (x + TRUNK_ECHO * echoes) / np.sqrt(1 + count * TRUNK_ECHO ** 2)


def ground(x, bounce):
    """The ground bounce lags most when the bike is nearest, so a comb sweeps down and up again."""
    lag = 2 * PIPE_HEIGHT_M * EAR_HEIGHT_M / distance_m() / 343
    return x + bounce * np.array([read(channel, TIME - lag) for channel in x])


def distance_m():
    """How far away the bike is."""
    return np.hypot(NEAREST_M, SPEED_M_S * (TIME - PASSING_S))


def spreading_db():
    """Loss by spreading, against the nearest point."""
    return 20 * np.log10(NEAREST_M / distance_m())


def from_db(db):
    """Decibels to gain."""
    return 10 ** (np.asarray(db) / 20)


def rms_one(x):
    """Scale to rms 1."""
    return x / np.sqrt(np.mean(x ** 2) + 1e-20)


def peak_one(gain):
    """Scale a response so that a unit impulse peaks at 1."""
    return gain / np.abs(irfft(gain)).max()


def in_time(rows):
    """The columns of a curve table, one value per sample."""
    s, *columns = np.transpose(rows)
    return [np.interp(TIME, s, c) for c in columns]


def response(points):
    """Causal (minimum-phase) response with the given spectrum."""
    hz, db = np.transpose(points)
    level_db = np.interp(np.log(HZ), np.log(hz), db)
    cepstrum = irfft(np.log(from_db(level_db)))
    # folding the cepstrum onto positive time makes the response causal
    cepstrum[1:SIZE // 2] *= 2
    cepstrum[SIZE // 2 + 1:] = 0
    return np.exp(rfft(cepstrum))


def through(x, gain):
    """Pass a sound through a frequency response."""
    return irfft(rfft(x, SIZE) * gain)[..., :N]


def read(x, seconds):
    """A sound read at other moments."""
    return np.interp(seconds * SR, np.arange(len(x)), x)


def drift(per_s):
    """Random wander of rms 1 with the given number of steps per second."""
    knots = rng.standard_normal(int(N / SR * per_s) + 2)
    return rms_one(np.interp(TIME * per_s, np.arange(len(knots)), knots))


def steady(x, span_s=0.046):
    """Hold the running level of a (mid, side) pair, judged on the mid, at 1, keeping its pulses."""
    size = int(span_s * SR)
    power = uniform_filter1d(uniform_filter1d(x[0] ** 2, size), size)
    return x / np.sqrt(power + 1e-14)


def strikes(times, sizes):
    """Impulses at the given moments."""
    out = np.zeros(N)
    samples = np.round(np.asarray(times) * SR).astype(int)
    np.add.at(out, np.clip(samples, 0, N - 1), sizes)
    return out


def dying(impulses, decay_s):
    """Let each impulse die away exponentially."""
    return signal.lfilter([1], [1, -np.exp(-1 / (decay_s * SR))], impulses + 1e-18)


def scene(left_db=-0.74):
    """All sources as left and right: the bass is mostly common to both, the treble is wide."""
    pipe = silencer()
    cycles, rate = engine_cycles()
    engine = exhaust(pipe, cycles, rate) + overrun(pipe, cycles) + intake(cycles, rate)
    engine = engine + valve_gear(cycles, rate) + cases(cycles, rate) + gear_whine(cycles, rate)
    trail = tyres() + spray()
    wood = rustles() + twigs() + ticks() + air()
    mid, side = engine + trail + wood
    side = through(side, np.abs(response(STEREO_WIDTH)))
    return np.array([(mid + side) * from_db(left_db), mid - side])


def record(dry, dip_hz=8300, dip_width_hz=560, dip_db=-35):
    """The tallest peaks are rounded, the treble has one narrow dip and the top is cut."""
    rounded = dry / (1 + (dry / .95) ** 6) ** (1 / 6)
    dip = from_db(dip_db * np.exp(-((HZ - dip_hz) / dip_width_hz) ** 4))
    top = 1 / (1 + (HZ / CUTOFF_HZ) ** 120)
    return through(rounded, dip * top)


dry = scene()
out = record(dry)
put_to_file(out)
```